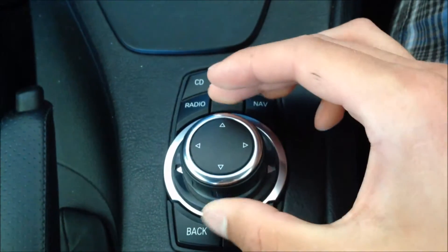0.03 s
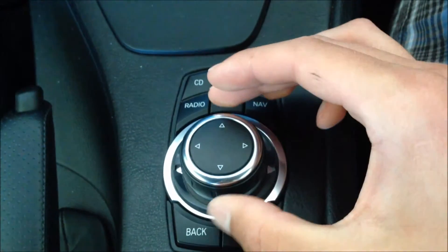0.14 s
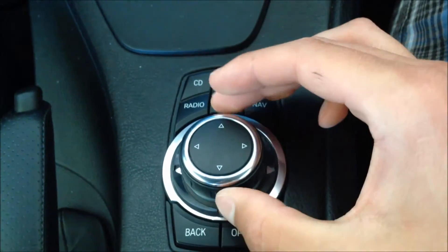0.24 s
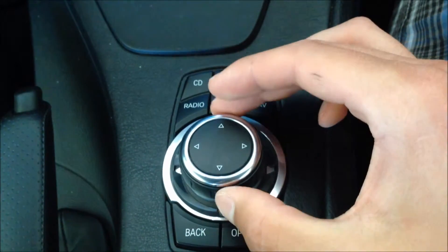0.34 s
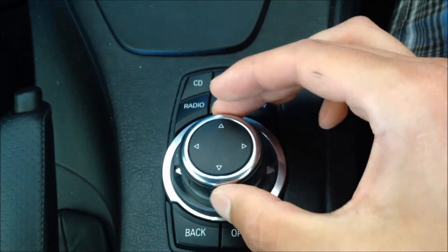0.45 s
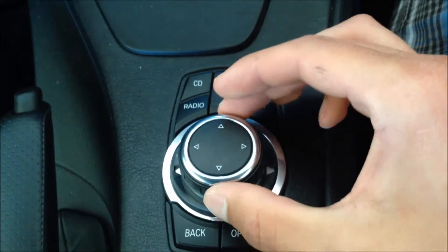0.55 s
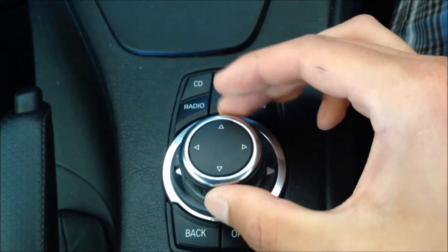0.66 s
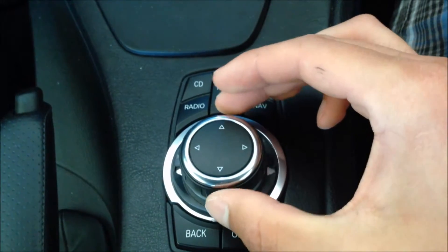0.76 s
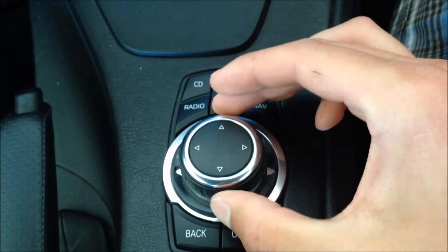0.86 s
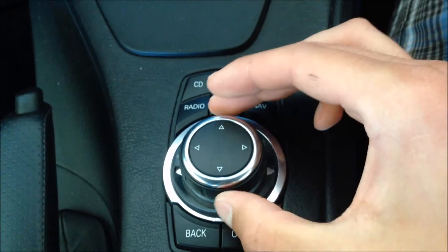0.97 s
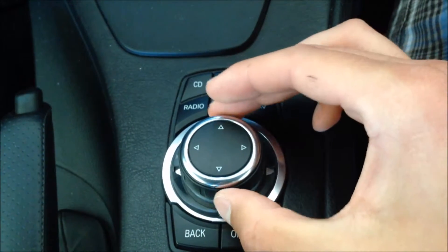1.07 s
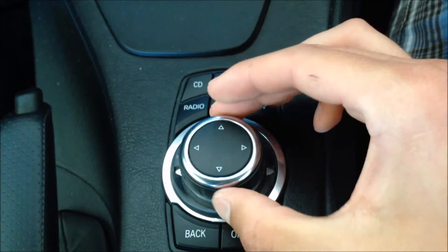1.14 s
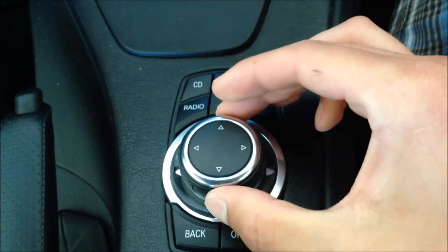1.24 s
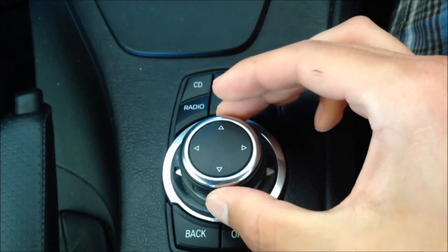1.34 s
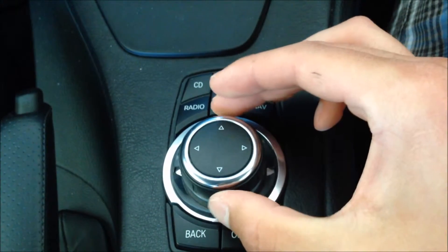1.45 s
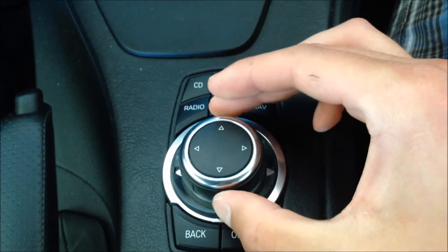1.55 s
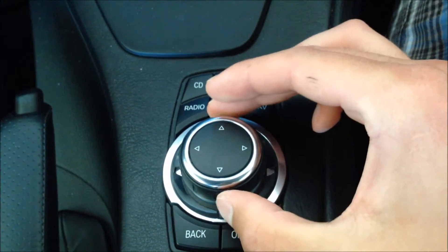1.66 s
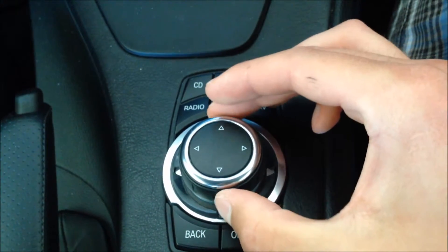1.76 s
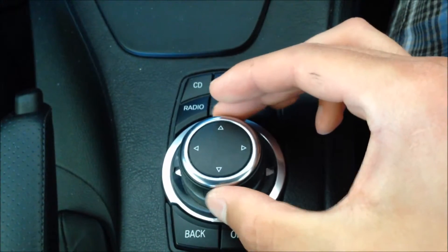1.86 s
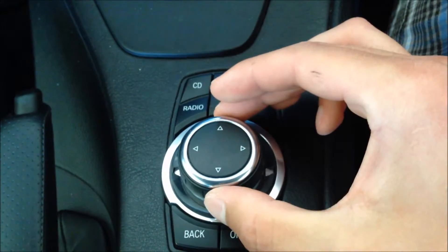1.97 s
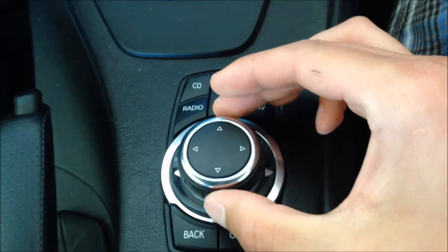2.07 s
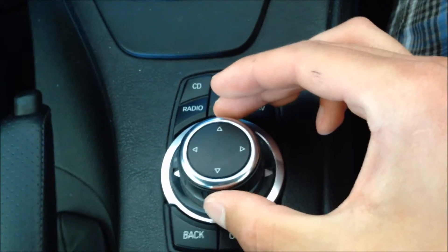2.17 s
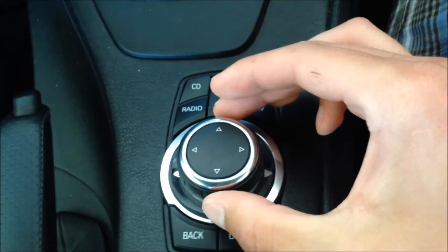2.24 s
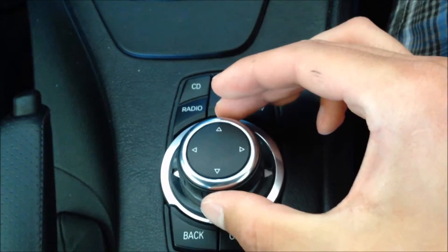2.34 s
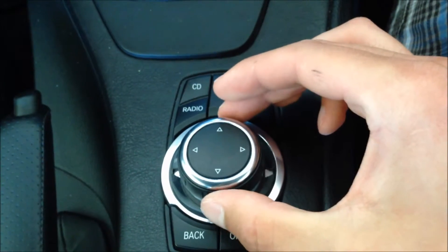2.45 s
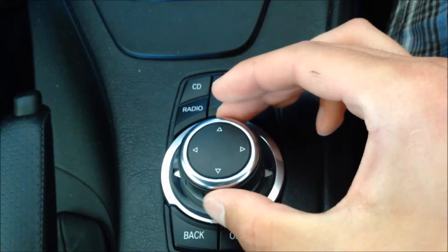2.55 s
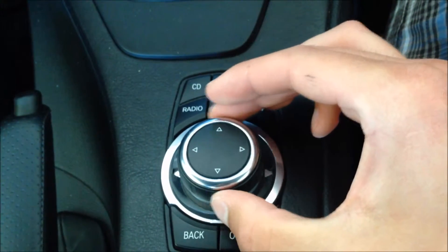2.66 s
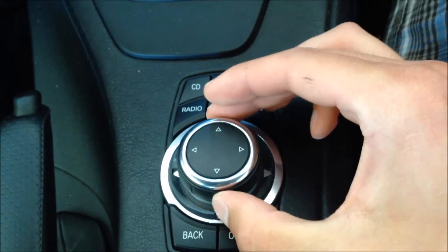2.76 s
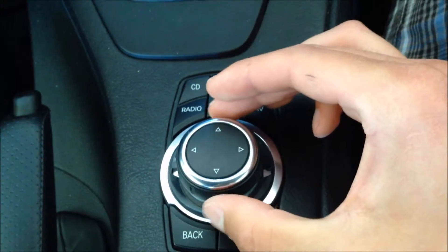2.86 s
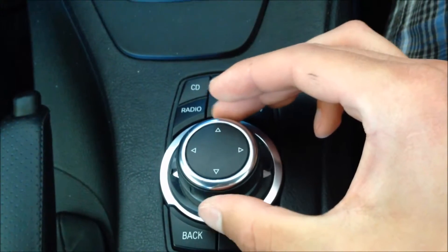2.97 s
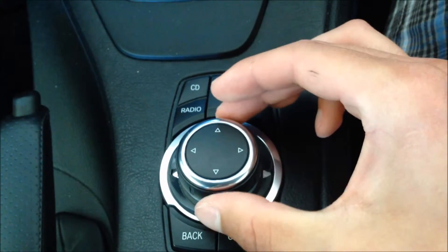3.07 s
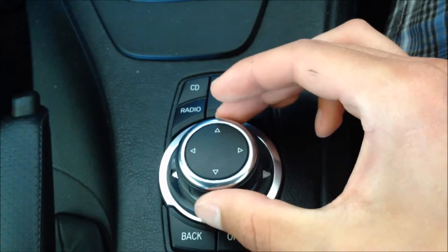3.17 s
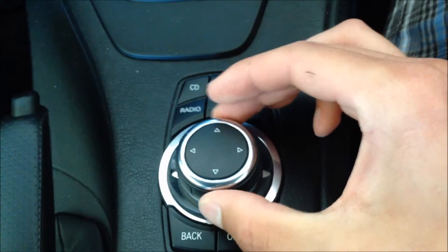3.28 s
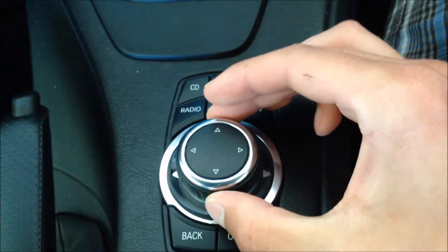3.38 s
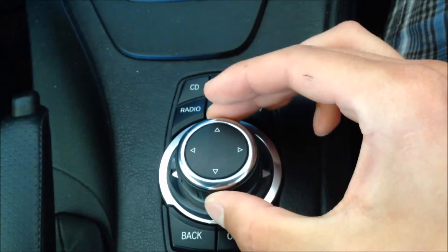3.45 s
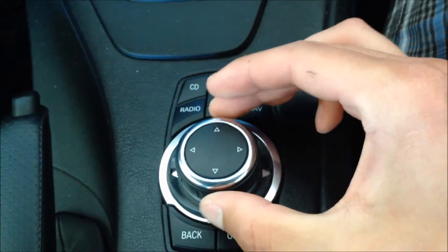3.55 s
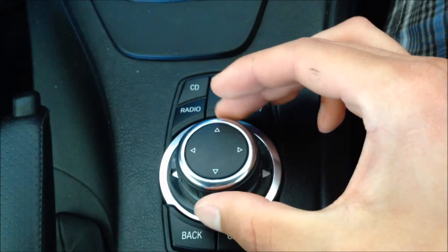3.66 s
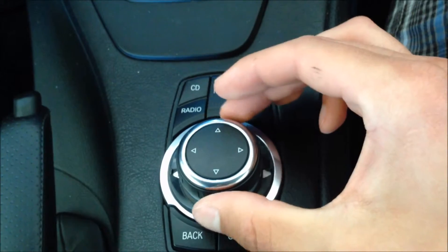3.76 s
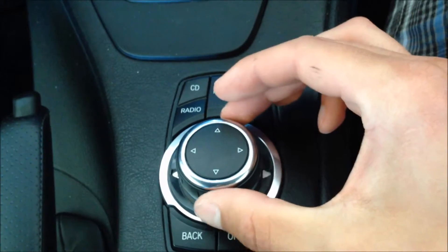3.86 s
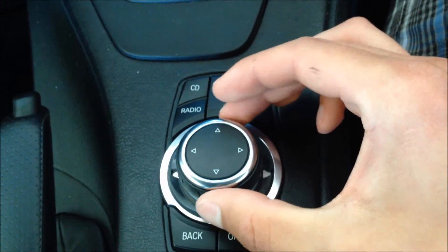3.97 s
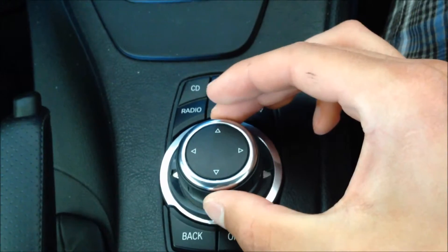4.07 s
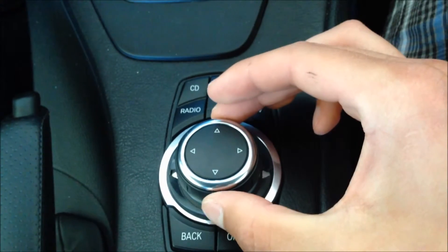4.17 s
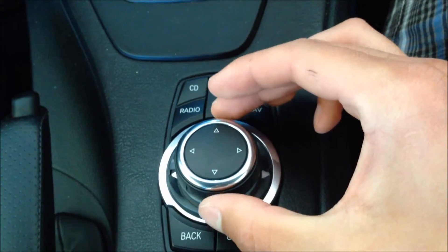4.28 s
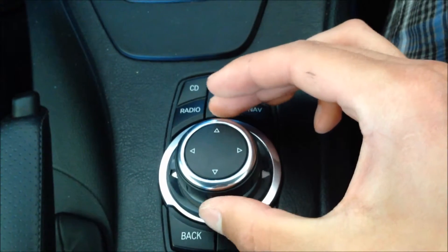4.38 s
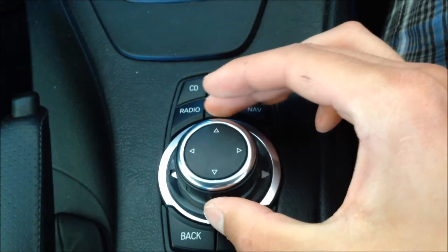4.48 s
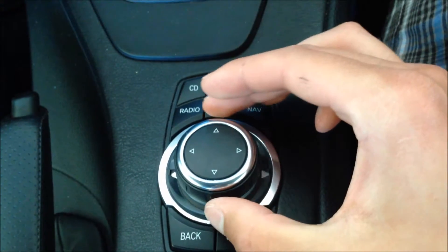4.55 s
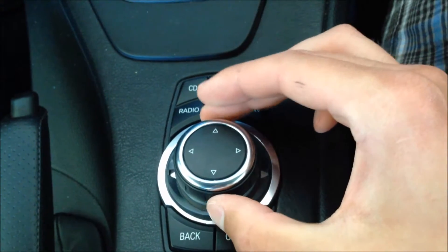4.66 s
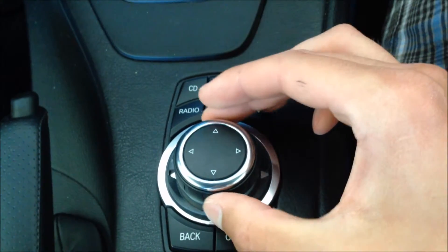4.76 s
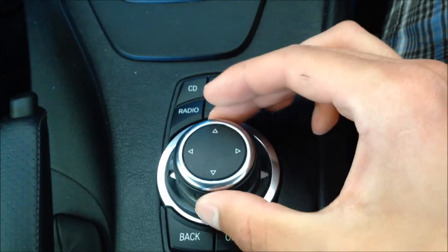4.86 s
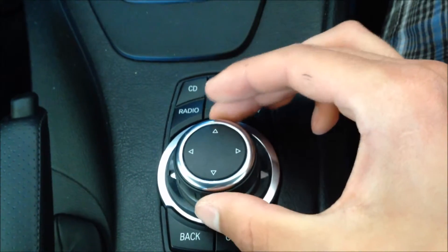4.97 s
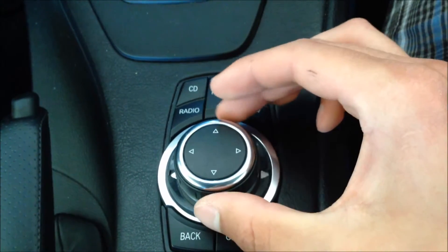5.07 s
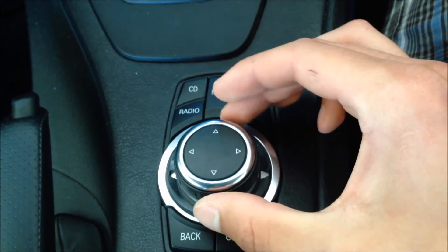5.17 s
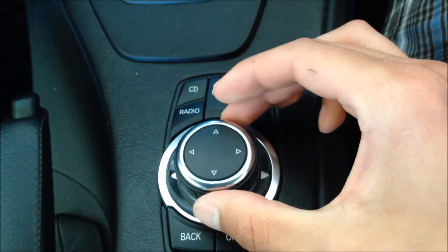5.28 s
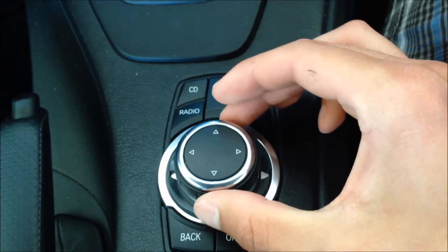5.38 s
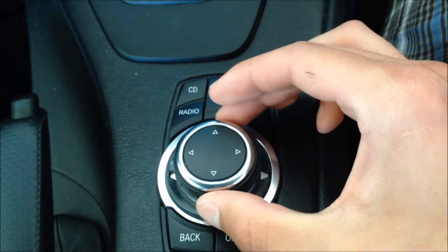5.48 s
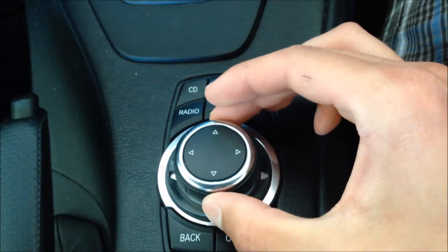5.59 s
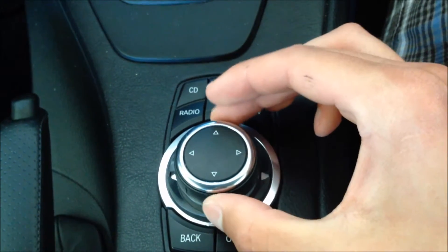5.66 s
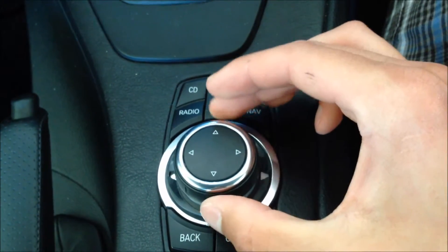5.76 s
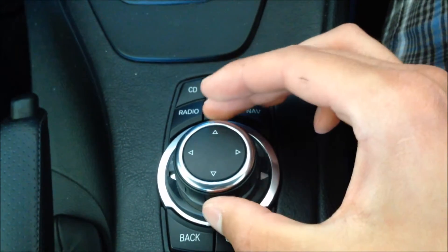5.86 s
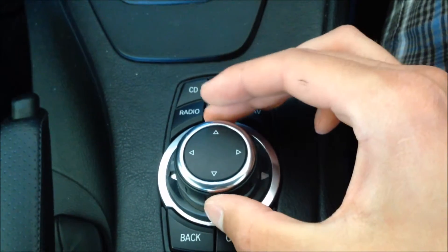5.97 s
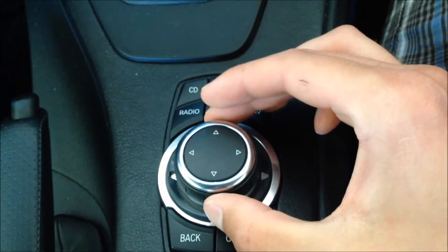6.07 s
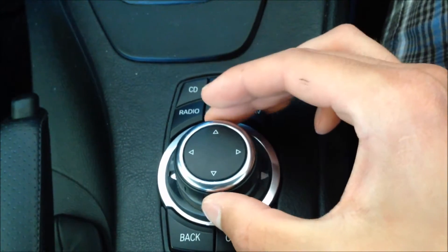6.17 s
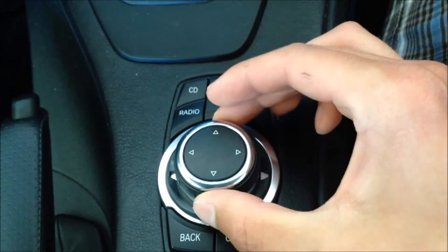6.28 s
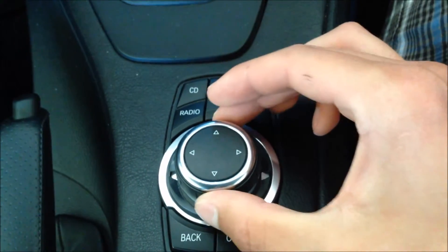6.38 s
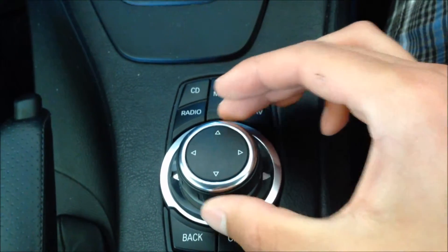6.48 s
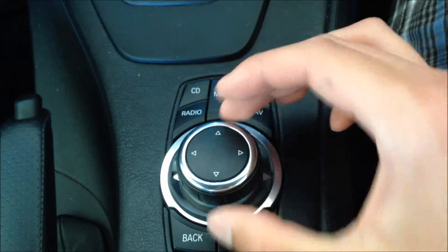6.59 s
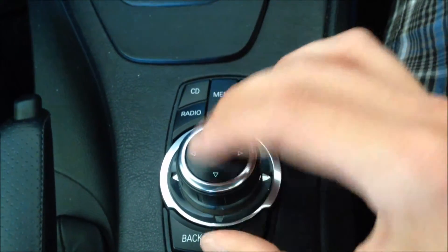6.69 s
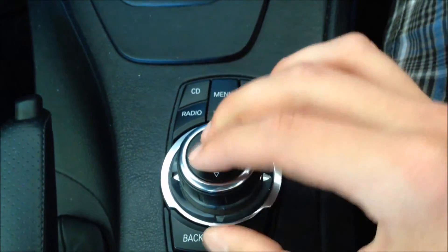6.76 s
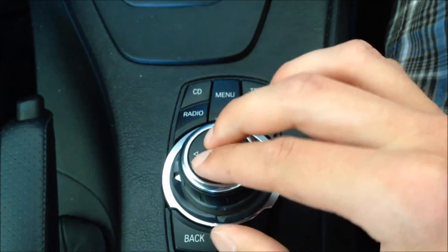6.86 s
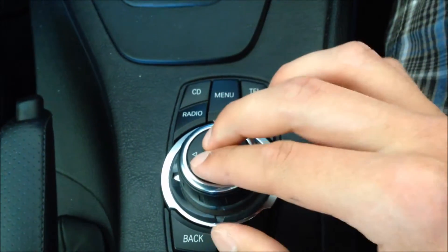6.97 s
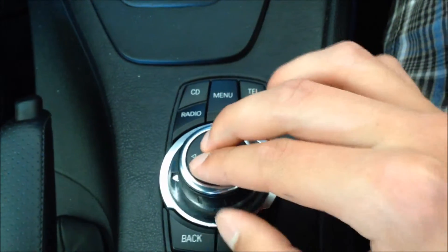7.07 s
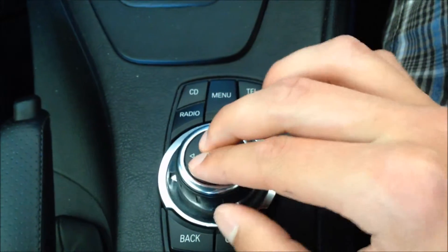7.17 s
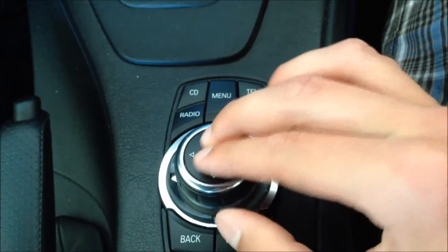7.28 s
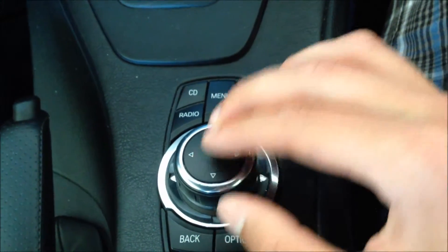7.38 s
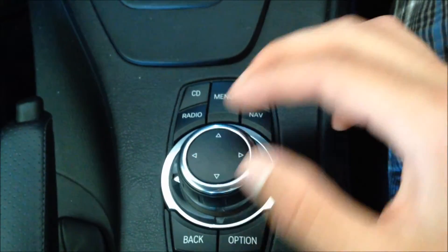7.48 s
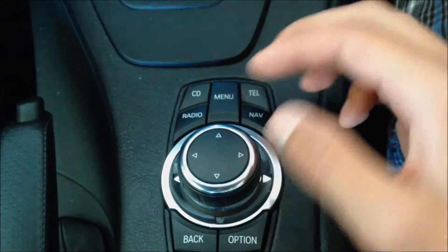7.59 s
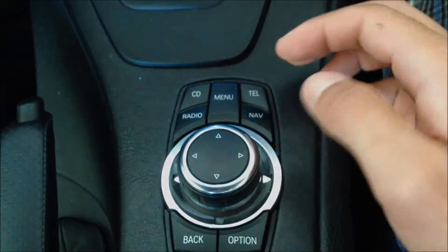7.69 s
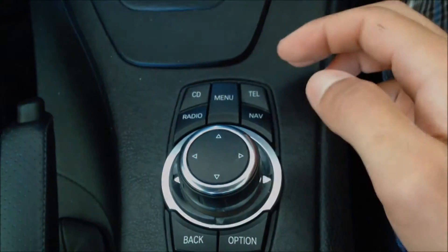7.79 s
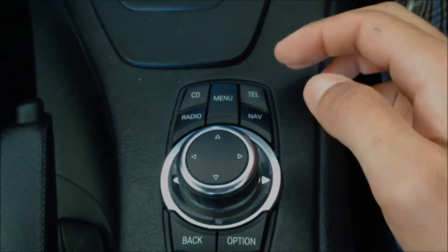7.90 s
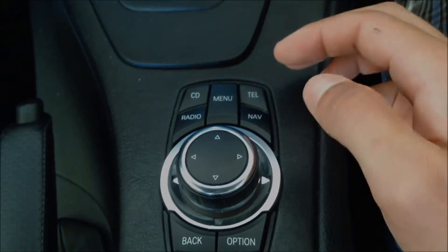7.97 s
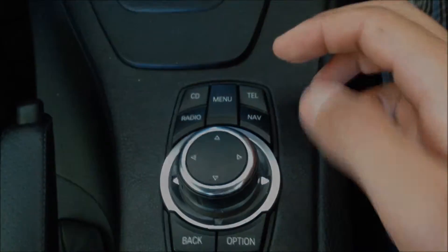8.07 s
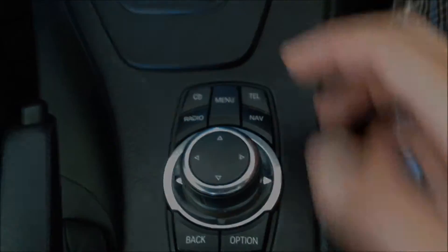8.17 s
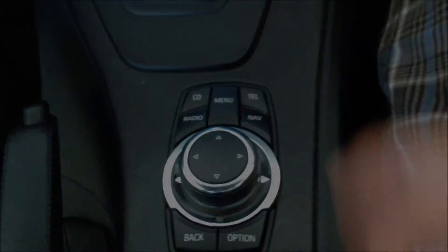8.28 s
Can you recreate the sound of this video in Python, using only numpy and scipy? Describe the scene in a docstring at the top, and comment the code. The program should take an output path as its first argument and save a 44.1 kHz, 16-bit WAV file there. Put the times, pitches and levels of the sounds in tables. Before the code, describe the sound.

A rotary knob in a quiet car clicks slowly through nine small detents, then a louder double clunk of press and release, ending in faint cloth rustle.

```python
"""Parked car: a hand turns a rotary knob through nine detents, then presses it down and lets go.
Before each detent the spring scrapes up its ramp, then it snaps over, bounces, and the knob seats in its housing.
The press clicks a switch and thumps the console; fingertips tap dully and a sleeve rustles at the end.
Blows ring decaying modes, scrapes and rattles are tiny random slips, cloth and background are shaped noise.
A faint hum and microphone hiss lie under it all."""
import sys
import numpy as np
from scipy import signal
from scipy.fft import rfft, irfft, next_fast_len
from scipy.io import wavfile
from scipy.ndimage import uniform_filter1d

SR = 44100
rng = np.random.default_rng(int(sys.argv[2]) if len(sys.argv) > 2 else 0)


def volts_from_db(level):
    """Convert decibel levels to linear amplitude ratios."""
    exponent = np.asarray(level, float) / 20
    return 10 ** exponent


def store_pcm(level_fs):
    """Save levels as 16-bit WAV."""
    pcm = np.round(np.clip(level_fs, -1, 1) * 32767).astype(np.int16)
    wavfile.write(sys.argv[1], SR, np.atleast_2d(pcm).T)


N = 367397
TIME = np.arange(N) / SR


def unit(x):
    """Scale to rms 1."""
    return x / np.sqrt(np.mean(x ** 2))


def coloured(points):
    """Noise of rms 1 with its spectrum drawn through (Hz, relative dB) points."""
    hz, db = np.transpose(points)
    size = next_fast_len(N)
    axis = np.log(np.arange(size // 2 + 1) * SR / size + 1)
    gains = volts_from_db(np.interp(axis, np.log(hz), db))
    return unit(irfft(rfft(rng.standard_normal(size)) * gains, size)[:N])


def walk(rate):
    """Slow random drift: levels held for 1 / rate seconds, then smoothed twice."""
    hold = int(SR / rate)
    steps = np.repeat(rng.standard_normal(N // hold + 1), hold)
    return 0.98 * uniform_filter1d(uniform_filter1d(steps, hold), hold)[:N]


def ring(modes, tilt_db=0., push_s=0.00017, chance_db=0., free_s=np.inf):
    """A body answers one push, peak 1; the push swells over push_s, the part is caught after free_s."""
    hz, db, t60_s = np.transpose(modes)[:, :, None]
    t = np.arange(int(1.2 * t60_s.max() * SR)) / SR
    gains = volts_from_db(db + tilt_db * np.log2(hz / np.median(hz)) + chance_db)
    decay = np.exp(-np.log(1000) * t / t60_s)
    wave = (gains * np.sin(2 * np.pi * hz * t) * decay).sum(axis=0)
    wave = wave * (1 - np.exp(-(t / push_s) ** 2))
    caught_db = -16  # what still rings once the part is held again
    wave = wave * (volts_from_db(caught_db) + np.exp(-(t / free_s) ** 4))
    return wave / np.abs(wave).max()


def add(out, s, wave):
    """Lay a sound into out at time s."""
    i = int(s * SR)
    out[i:i + len(wave)] += wave[:N - i]


def blows(modes, times, peak_db, tilt_db=0., *, push_s, scatter_db, sign=1, stretch=1, free_s=np.inf):
    """Each blow lands a little differently, so the modes share it anew; stretch retunes the body."""
    out = np.zeros(N)
    rows = zip(*np.broadcast_arrays(times, peak_db, tilt_db, sign, stretch, free_s))
    for s, db, tilt, direction, tuning, free in rows:
        chance_db = scatter_db * rng.standard_normal((len(modes), 1))
        body = np.array(modes) * [tuning, 1, 1]
        add(out, s, np.sign(direction) * volts_from_db(db) * ring(body, tilt, push_s, chance_db, free))
    return out


def slips(rate, spread_db, body):
    """Tiny uneven slips, rate per second on average, ring a body; none far above the rest; rms 1."""
    size_db = spread_db * np.minimum(rng.exponential(size=N), 3)
    kicks = (rng.random(N) < rate / SR) * volts_from_db(size_db) * np.sign(rng.standard_normal(N))
    return unit(signal.oaconvolve(kicks, body)[:N])


# colour of the background: pitch_hz [Hz], level_db [relative dB per Hz]
BACKGROUND = [(15, -40), (25, -20.5), (64, -9), (113, -16.5), (145, -4.5), (173, -11), (330, -17.5),
              (500, -18.5), (967, -22), (1500, -23.5), (2300, -23), (3510, -20), (8000, -22.5),
              (15400, -23.5)]
# narrow hum lines: pitch_hz [Hz], level_db [dB rms], both the centre of a waver
HUM_LINES = [(145.3, -74.5), (325.0, -84.5)]


def quiet():
    """Muffled outside rumble and hiss, with two narrow hum lines that waver in level and pitch."""
    out = volts_from_db(-64) * coloured(BACKGROUND)
    rumble_db = -78 + 2.5 * walk(14)
    out = out + volts_from_db(rumble_db) * coloured([(40, -30), (90, 0), (400, -4), (900, -30)])
    for pitch_hz, level_db in HUM_LINES:
        level = np.sqrt(2) * volts_from_db(level_db + 0.7 * walk(8.4))
        phase = 2 * np.pi * np.cumsum(pitch_hz + 0.87 * walk(13)) / SR
        out = out + level * np.sin(phase)
    return out


# dull fingertip taps: start_s [s], peak_db [dB], tilt_db [dB per octave]
FINGER_TAPS = [(0.1154, -52, -3), (2.708, -48, 4), (3.0593, -56, 7), (5.065, -57, 9)]
# modes under the fingertip: pitch_hz [Hz], level_db [relative dB], t60_s [s]
FINGERTIP_MODES = [(280, -1, .016), (400, 0, .012), (750, -2, .006), (1500, -4, .004)]


def taps():
    """A fingertip lands softly and rings a few low, quickly damped modes."""
    start_s, peak_db, tilt_db = np.transpose(FINGER_TAPS)
    return blows(FINGERTIP_MODES, start_s, peak_db, tilt_db, push_s=0.0005, scatter_db=1.5)


# detents: crest_s [s], climb_s [s long], climb_db [dB at the crest],
# housing_db [dB over each snap], panel_db [dB peak]
DETENT_STEPS = [(0.626, 0.12, -65, -8, -65), (1.313, 0.15, -64.5, -26, -66), (1.983, 0.09, -61, -21, -68),
                (2.781, 0.098, -61, -20, -60), (3.463, 0.091, -61.5, -18, -70), (4.151, 0.1, -63, -19, -61),
                (4.916, 0.076, -61, -14, -54), (5.655, 0.1, -62.5, -13.5, -65),
                (6.366, 0.083, -61.5, -20, -63)]
# modes of the sliding spring: pitch_hz [Hz], level_db [relative dB], t60_s [s]
RUB_MODES = [(2700, -8, .006), (3050, -5, .006), (3320, -2, .006), (3540, 0, .009), (3780, -1, .007),
             (4050, -2, .006), (4330, -5, .005)]


def climbs():
    """The spring scrapes up each ramp in patches, as many small slips, swelling to the crest."""
    level = np.zeros(N)
    for crest_s, climb_s, climb_db, *_ in DETENT_STEPS:
        way = np.interp(TIME, [crest_s - climb_s, crest_s, crest_s + 0.012], [0, 1, 0])
        level += volts_from_db(climb_db) * way ** 0.9
    patches = volts_from_db(2.0 * walk(60))
    return level * patches * slips(2000, 2.5, ring(RUB_MODES, push_s=0.0004))


# modes of the last skid: pitch_hz [Hz], level_db [relative dB], t60_s [s]
SKID_MODES = [(2760, 5, 0.016), (2800, -5, 0.0095), (3040, 0, 0.0074), (3520, -15, 0.011)]


def skids():
    """The last skid before a crest or a switch click: faster slips that swell steeply and stop dead."""
    over_climb_db, under_click_db, swell_s = 6, -21, 0.005
    ends = [(s, db + over_climb_db) for s, _, db, *_ in DETENT_STEPS]
    ends += [(s, db + under_click_db) for s, db, *_ in SWITCH_CLICKS]
    level = np.zeros(N)
    for end_s, level_db in ends:
        level += volts_from_db(level_db) * np.exp(np.minimum(TIME - end_s, 0) / swell_s) * (TIME < end_s)
    return level * slips(5000, 1.5, ring(SKID_MODES))


# the spring snapping over and bouncing: start_s [s], peak_db [dB], treble_db [dB over peak_db],
# pitch_hz [Hz, main spring mode], free_s [s of free ring]
SPRING_SNAPS = [(0.6295, -34.5, -13, 3660, 0.0025), (0.644, -39, -7, 3480, 0.0018),
                (0.6478, -45, -14, 3470, .0016), (1.3156, -36.5, -8, 3800, .0012),
                (1.317, -30.5, -3.5, 3640, 0.0018), (1.334, -33.5, -7, 3700, .0018),
                (1.9844, -40, -14, 3480, .0016), (1.9864, -34.5, -14.5, 3590, 0.0017),
                (1.992, -32.5, -10, 3610, .0017), (2.0092, -44, -9, 3550, .002),
                (2.7835, -34.5, -9.5, 3750, 0.0025), (2.788, -34.5, -11, 3740, 0.0018),
                (2.7902, -36, -15, 3500, 0.0013), (2.7933, -43, -15, 3900, .0015),
                (3.463, -26, -7, 3640, 0.0026), (3.4663, -37, -13, 3640, 0.0024),
                (3.4693, -44, -10, 3900, .0015), (4.1564, -25, -9, 3614, 0.0028),
                (4.159, -32, -10, 3930, 0.0016), (4.1597, -27, -6, 3500, 0.0013),
                (4.1702, -40, -14.5, 3520, .0015), (4.1722, -39, -14.5, 3900, 0.0015),
                (4.9185, -27, -2, 3830, 0.0032), (4.9215, -30.5, -7, 3730, 0.0018),
                (4.927, -43, -10, 3700, .0015), (4.9337, -32.5, -8, 3720, .0018),
                (5.6606, -38.5, -3, 3250, 0.0016), (5.6618, -36, -8, 3750, 0.0025),
                (5.6648, -35.5, -14, 4030, .0012), (5.6657, -32, -14, 4090, 0.001),
                (5.6709, -38, -16, 3930, .0013), (6.366, -28.5, -18, 3780, .0016),
                (6.3683, -30.5, -14, 3630, 0.0019), (6.3797, -43, -18, 3600, .0015),
                (6.381, -37, -16, 3730, 0.0022), (6.3846, -40, -19, 3700, .0015)]
# modes of spring, bright small parts, housing and console panel:
# pitch_hz [Hz], level_db [relative dB], t60_s [s]
SPRING_MODES = [(3390, -15, .02), (3600, 0, .03), (3850, -14, .016), (4170, -18, .012)]
TREBLE_MODES = [(4780, 7.5, 0.0062), (5090, -11, 0.027), (5550, -9, 0.019), (5940, 6, 0.008),
                (6190, 0, 0.0093), (6740, 12, 0.0037), (7090, -5.5, 0.015), (8680, 6.5, 0.005),
                (9460, -2.5, 0.011), (10670, -2, 0.0063), (11930, -3.5, 0.0072), (13700, 1, 0.0058),
                (15100, -3.5, 0.0045)]
HOUSING_MODES = [(815, -6, 0.035), (1025, -9, .025), (1132, -3, 0.03), (1268, -6, 0.035), (1420, 0, 0.025),
                 (1602, -7, 0.025), (1840, -11, 0.035), (2033, -2, 0.04), (2320, 0, 0.03), (2460, -3, .022),
                 (2538, 0, 0.03), (2730, -4, 0.025), (2952, -10, 0.023)]
PANEL_MODES = [(200, -8.5, 0.048), (245, 1.5, 0.065), (288, 1.5, 0.061), (368, -10.5, 0.083),
               (430, -30, 0.034), (538, -13.5, 0.066), (657, -9.5, 0.02)]
SEAT_FREE_S = 0.004  # the housing rings freely this long under snaps and seats


def snaps():
    """The spring snaps over and bounces, ringing itself, the treble modes, the housing and the panel."""
    start_s, peak_db, treble_db, pitch_hz, free_s = np.transpose(SPRING_SNAPS)
    crest_s, _, _, housing_db, panel_db = np.transpose(DETENT_STEPS)
    nearest = np.abs(start_s[:, None] - crest_s).argmin(axis=1)
    spring = blows(SPRING_MODES, start_s, peak_db, push_s=0.0005, scatter_db=1.5,
                   stretch=pitch_hz / SPRING_MODES[1][0], free_s=free_s)
    treble = blows(TREBLE_MODES, start_s, peak_db + treble_db, push_s=0.0005, scatter_db=3.0)
    housing = blows(HOUSING_MODES, start_s, peak_db + housing_db[nearest], 4,
                    push_s=0.00051, scatter_db=3.0, free_s=SEAT_FREE_S)
    panel = blows(PANEL_MODES, crest_s + 0.008, panel_db, 10, push_s=0.002, scatter_db=3.0)
    return spring + treble + housing + panel


# modes of the loose parts: pitch_hz [Hz], level_db [relative dB], t60_s [s]
LOOSE_MODES = [(3150, -4, .006), (3450, 0, .007), (3800, 0, .006), (4050, 0, .006), (4350, -4, .005)]


def rattles():
    """Loose parts rattle out after every snap and switch click, as slips that die away."""
    fade = np.exp(-TIME[:SR // 10] / 0.012)
    after_snap, after_click = np.zeros((2, N))
    for start_s, peak_db, *_ in SPRING_SNAPS:
        add(after_snap, start_s, volts_from_db(peak_db - 26) * fade)
    for start_s, _, housing_db, *_ in SWITCH_CLICKS:
        add(after_click, start_s, volts_from_db(housing_db - 23) * fade)
    # the loose parts count twice
    snap_body = HOUSING_MODES[6:] + LOOSE_MODES + LOOSE_MODES + TREBLE_MODES[:9]
    click_body = HOUSING_MODES[2:] + SWITCH_MODES + TREBLE_MODES[:5]
    rattle = after_snap * slips(1500, 3.7, ring(snap_body, -2.1, free_s=0.0033))
    return rattle + after_click * slips(1500, 4.5, ring(click_body, -4.4))


# the knob seating: start_s [s], housing_db [dB peak], tilt_db [dB per octave], panel_db [dB peak]
KNOB_SEATS = [(0.6467, -46, 8, -56), (1.336, -47, -3, -65), (1.341, -51, -11, -56), (2.012, -44.5, 0, -65),
              (2.0175, -52, -2, -59), (2.802, -43.5, -6, -58), (2.8069, -50, -5, -52.5),
              (3.4895, -54.5, -14, -69), (4.172, -47, 0, -63), (4.1747, -49, -9, -70),
              (4.1788, -52, -10, -51.5), (4.9242, -39, 2, -58), (4.931, -44, 0, -58), (4.934, -49, 0, -64),
              (4.9388, -48, -8, -52.5), (5.682, -47, -6, -60), (5.6847, -59, -1, -63), (6.371, -47, 0, -60),
              (6.382, -39.5, -3, -55), (6.387, -48, -3, -54)]


def seats():
    """The knob seats in its housing with short, dull knocks that also reach the panel."""
    start_s, housing_db, tilt_db, panel_db = np.transpose(KNOB_SEATS)
    housing = blows(HOUSING_MODES, start_s, housing_db, tilt_db,
                    push_s=0.00074, scatter_db=3.0, free_s=SEAT_FREE_S)
    return housing + blows(PANEL_MODES, start_s, panel_db, 10, push_s=0.002, scatter_db=3.0)


# blows felt by the console: start_s [s], frame_db [dB peak], direction [+1 down, -1 up],
# panel_db [dB peak]
CONSOLE_THUMPS = [(2.668, -65, 1, -59), (2.695, -66, 1, -65), (4.919, -67, 1, -55), (5.074, -56.5, 1, -65),
                  (6.369, -57, 1, -63), (6.545, -58.5, 1, -58.5), (7.171, -51, -1, -36),
                  (7.176, -27.5, -1, -27.5), (7.196, -40, -1, -41.5), (7.262, -34, 1, -51),
                  (7.316, -60, 1, -51), (7.346, -31, 1, -40), (7.353, -19, 1, -52), (7.3562, -45, 1, -21.5),
                  (7.378, -38, -1, -35), (7.47, -55, 1, -64), (7.508, -54.5, 1, -74), (8.2, -60, 1, -57)]
# modes of the console frame: pitch_hz [Hz], level_db [relative dB], t60_s [s]
FRAME_MODES = [(63.5, -16, 0.14), (98.5, 2.5, 0.1), (113.1, -5, 0.15), (140.7, -29, 0.46)]


def thumps():
    """The hand thumps the console; the heavy frame takes longer to get moving than the panel."""
    start_s, frame_db, direction, panel_db = np.transpose(CONSOLE_THUMPS)
    frame = blows(FRAME_MODES, start_s, frame_db, sign=direction, push_s=0.00577, scatter_db=1.5)
    panel = blows(PANEL_MODES, start_s - 0.002, panel_db, sign=direction, push_s=0.0029, scatter_db=1.0)
    return frame + panel


# switch clicks of the press and release: start_s [s], switch_db, housing_db, treble_db [dB peak],
# housing_tilt_db, treble_tilt_db [dB per octave]
SWITCH_CLICKS = [(7.1716, -19.5, -22.5, -24, 1, -10), (7.1759, -41, -21, -35, -10.5, -9),
                 (7.179, -43, -31, -40, -13, -9), (7.205, -57, -36, -60.5, -8, -8),
                 (7.2590, -44, -35, -34, 1, -6), (7.2608, -43, -31.5, -40, -9.5, -6),
                 (7.2639, -52, -44, -44, -6, -2), (7.315, -51, -47.5, -54, 0.5, -6.5),
                 (7.3512, -14.5, -11, -20, 8.5, -21.5), (7.3527, -27, -34, -32.5, 2, -1),
                 (7.3548, -31, -27, -25, 11, 1)]
# modes of the switch dome: pitch_hz [Hz], level_db [relative dB], t60_s [s]
SWITCH_MODES = [(3300, -13, 0.012), (3330, -2.5, 0.016), (3530, -3.5, 0.017)]


def clicks():
    """The switch clicks through its dome, ringing the dome, the treble modes and the housing."""
    start_s, switch_db, housing_db, treble_db, housing_tilt_db, treble_tilt_db = np.transpose(SWITCH_CLICKS)
    dome = blows(SWITCH_MODES, start_s, switch_db, push_s=0.000083, scatter_db=1.5)
    treble = blows(TREBLE_MODES, start_s, treble_db, treble_tilt_db, push_s=0.00035, scatter_db=1.5)
    housing = blows(HOUSING_MODES, start_s, housing_db, housing_tilt_db, push_s=0.00027, scatter_db=1.5)
    return dome + treble + housing


# sleeve and seat rustle, breakpoints: start_s [s], level_db [dB before the graining],
# treble_db [dB over level_db]
CLOTH_RUSTLE = [(7.6, -85, -0.5), (7.78, -70, -1), (7.87, -94, 10), (8.128, -77, -2), (8.21, -61.5, 1.5),
                (8.232, -67.5, 1), (8.304, -62.5, -9), (8.33, -62.5, 0.5)]


def rustle():
    """Cloth rubs in uneven grains; its dull and bright parts swell apart."""
    start_s, level_db, treble_db = np.transpose(CLOTH_RUSTLE)
    dull = coloured([(150, -15.0), (300, -2), (600, -4.5), (1500, -0.5), (2600, -3.5), (4000, -46.0)])
    dull = dull * volts_from_db(np.interp(TIME, start_s, level_db, left=-120))
    bright = coloured([(2000, -44.0), (3300, 3.5), (7000, -3.0), (14000, -15)])
    bright = bright * volts_from_db(np.interp(TIME, start_s, level_db + treble_db, left=-120))
    grains = volts_from_db(1.5 * walk(150))
    return grains * (dull + bright)


def cabin(x):
    """Small padded cabin: dense short echoes of even colour, the treble dying first."""
    t60_s, echo_db = 0.065, -13.5
    t = np.arange(int(0.15 * SR)) / SR
    noise = rng.standard_normal(len(t)) * np.minimum(t / 0.0075, 1)
    low = signal.lfilter(*signal.butter(1, 4500, fs=SR), noise)
    tail = low * volts_from_db(-60 * t / t60_s) + (noise - low) * volts_from_db(-60 * t / (0.6 * t60_s))
    spectrum = rfft(tail)
    spectrum = spectrum / uniform_filter1d(np.abs(spectrum), size=30)  # evens out the colour
    tail = irfft(spectrum, len(t))[:SR // 10]
    return x + volts_from_db(echo_db) * signal.oaconvolve(x, tail / np.linalg.norm(tail))[:N]


def scene():
    """One microphone feeds both channels; only the knob and switch sounds get cabin echoes."""
    knob = climbs() + skids() + snaps() + rattles() + seats() + clicks()
    mono = quiet() + taps() + cabin(knob) + thumps() + rustle()
    return np.array([mono, mono])


def top_cut(x):
    """Nothing passes above the cut-off."""
    return signal.sosfilt(signal.butter(12, 15480, fs=SR, output="sos"), x)


def record(dry):
    """Deliver the finished two-channel mix."""
    return top_cut(dry)


dry = scene()
out = record(dry)
store_pcm(out)
```